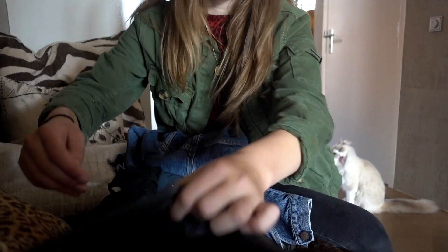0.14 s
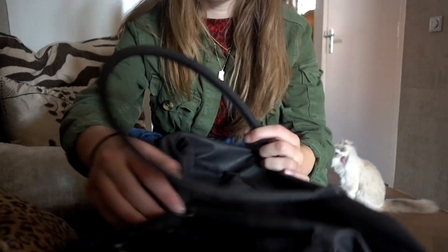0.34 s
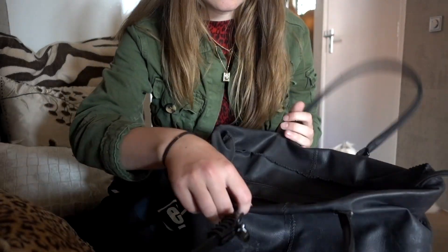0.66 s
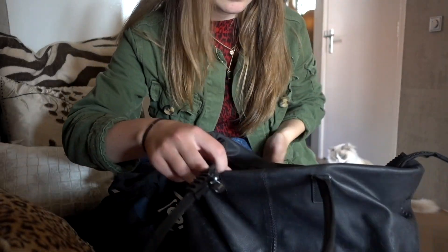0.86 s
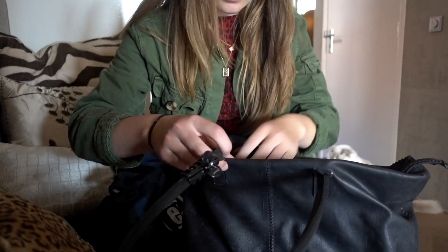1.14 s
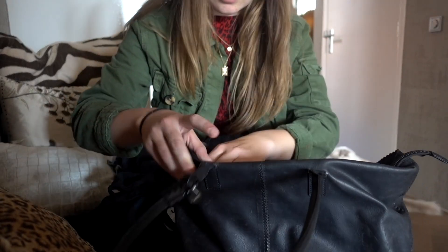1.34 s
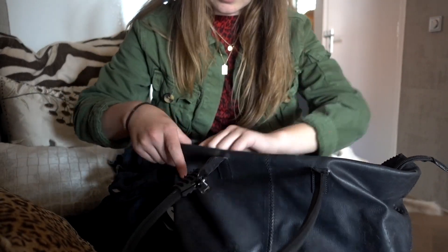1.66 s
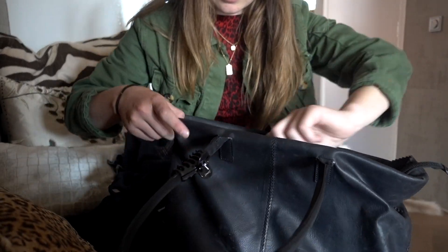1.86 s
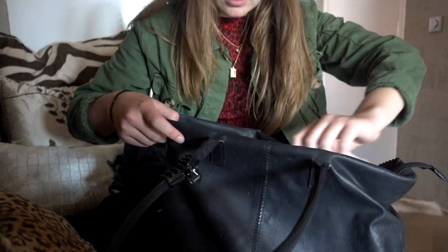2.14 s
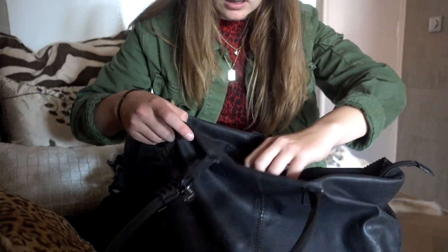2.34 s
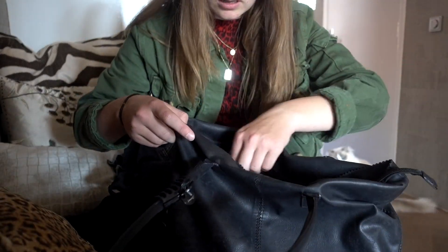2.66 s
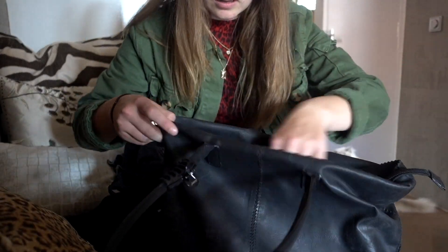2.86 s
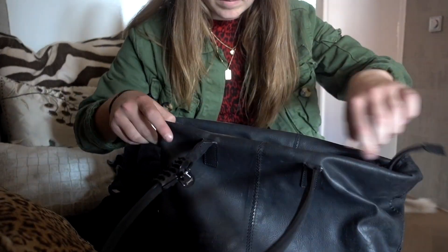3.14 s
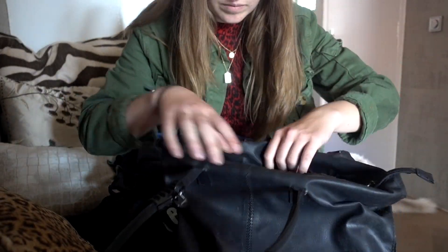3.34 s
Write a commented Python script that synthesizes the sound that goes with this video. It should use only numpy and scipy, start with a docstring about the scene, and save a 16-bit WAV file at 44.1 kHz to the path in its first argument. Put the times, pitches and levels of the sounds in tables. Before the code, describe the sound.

A soft leather handbag is handled close to a stereo microphone in a furnished room. Rustling is fullest in the first 0.9 seconds, with a scuffle at 0.24 and dull knocks, then quieter with a crackle at 1.25. A brief stuttering drag at 1.8-2.0 ends in a sharp snap. Scuffs at 2.7 precede the loudest, squeakier scrape at 2.93-3.15, then a knock at 3.3. Faint hiss, short room tail.

```python
"""A furnished room, a stereo microphone close by: a soft leather handbag is pulled onto a lap and searched.
The leather rustles all along, as banded noise and tiny clicks; twice a hand drags over its grain and chatters,
stick and slip. Things inside knock dully, leather catches and lets go, brief bright rustles stand out and the
bag's weight thumps softly, all as bursts of ringing noise. A short room tail and a faint hiss lie under it."""
import sys
import numpy as np
from scipy import signal
from scipy.fft import rfft, irfft
from scipy.io import wavfile
from scipy.ndimage import uniform_filter1d

SR = 44100
rng = np.random.default_rng(int(sys.argv[2]) if len(sys.argv) > 2 else 0)


def bounce(signal):
    """Save signal as a 16-bit WAV file at the path given by the first command-line argument."""
    frames = np.transpose(np.atleast_2d(signal))
    limited = np.clip(frames, -1, 1)
    pcm = np.round(limited * 32767).astype(np.int16)
    wavfile.write(sys.argv[1], SR, pcm)


def attenuation_scalar(level_db):
    """Turn a level in dB into a linear amplitude multiplier (20 dB per decade)."""
    decades = np.asarray(level_db, float) / 20
    return 10 ** decades


N = 154350  # 3.5 s


# hand movement on the leather: (time [s], level [dB], treble lift before levelling [dB])
RUSTLE = [(0, -54, 0.5), (.08, -52.5, 3), (.13, -45, -1), (.22, -47.5, -3), (.28, -46, -2.5),
          (.45, -43, 0.5), (.58, -49, 1), (.72, -45, -1), (.95, -52, -2.5), (1.17, -55, -5.5),
          (1.34, -50.5, -1.5), (1.6, -51, -2), (1.76, -49.5, 1.5), (2.03, -49.5, -0.5), (2.3, -54.5, 2),
          (2.47, -50, -5), (2.66, -53, 1), (2.82, -44, -8), (2.88, -65.5, 9), (3.25, -47, 1),
          (3.5, -49, 0.5)]
# tone of the rubbed leather, relative: (frequency [Hz], density [dB per Hz])
LEATHER_TONE = [(40, -20), (130, -24), (230, -10), (450, -1.5), (660, -1.5), (1100, -5.5), (1600, -1),
                (2080, 2), (4340, -12.5), (9940, -12.5), (16000, -19.5)]
CREASES_PER_S, CREASE_SHARE = 300, 0.64  # share: rms beside sliding noise of 1
CRACKS_PER_S, CRACK_SHARE = 90, 0.45
FLUTTER_DB, PATCHY_DB = 2, 1.5  # spread of the bands' level, together and each alone
TREBLE_HZ = 3700


def rustle(t):
    """Each half octave has its own sliding noise and creases, shares wide cracks, and flutters in part alone."""
    freq = np.arange(N // 2 + 1) * SR / N
    together = walk(24.98)
    cracks = creases(CRACKS_PER_S)
    out = 0
    for hz in 60 * 2 ** np.arange(0, 8.6, .5):
        # neighbouring bands overlap
        share = np.cos(np.pi / 2 * np.clip(2 * np.log2((freq + 1) / hz), -1, 1))
        contact = rng.standard_normal(N) + CREASE_SHARE * creases(CREASES_PER_S) + CRACK_SHARE * cracks
        banded = irfft(rfft(contact) * share, N)
        lift_db = curve(RUSTLE, 2, t) * (hz > TREBLE_HZ)
        out = out + banded * attenuation_scalar(FLUTTER_DB * together + PATCHY_DB * walk(18) + lift_db)
    return unit(colour(out, LEATHER_TONE)) * attenuation_scalar(curve(RUSTLE, 1, t))


CREASE_SPREAD_DB = 0.5


def creases(per_s):
    """Clicks at random moments, of uneven size and either sign, rms 1."""
    draw = rng.random((3, N))
    happens = draw[0] < per_s / SR
    size = attenuation_scalar(-CREASE_SPREAD_DB * np.log(1 - .98 * draw[1]))
    return unit(happens * size * np.sign(draw[2] - .5))


# two drags of a hand over the grain, each: (time [s], level [dB], slip rate [per s], smear [0-1])
DRAGS = [
    [(1.775, -52, 450, 0.61), (1.8, -38.5, 470, 0.65), (1.84, -33, 450, 0.68), (1.865, -34.5, 355, 0.49),
     (1.885, -33.5, 313, 0.34), (1.91, -36.5, 435, 0.59), (1.935, -31.5, 440, 0.47), (1.96, -38, 440, 0.4),
     (1.975, -45.5, 400, 0.5), (1.99, -59, 470, 0.8)],
    [(2.912, -49.5, 870, 0.45), (2.935, -31, 740, 0.57), (2.955, -27, 680, 0.47), (2.98, -26.5, 760, 0.57),
     (3.0, -26, 880, 0.42), (3.02, -26.5, 950, 0.55), (3.035, -23, 1014, 0.42), (3.05, -22, 1100, 0.38),
     (3.066, -25, 770, 0.48), (3.09, -24, 633, 0.48), (3.108, -24, 520, 0.88), (3.122, -29, 410, 0.95),
     (3.2, -57, 310, 0.83)],
]
# tone of the dragged leather, relative: (frequency [Hz], density [dB per Hz])
DRAG_TONE = [(60, -53), (250, -20.5), (345, -11.5), (600, -13.5), (950, -6), (1200, -9.5), (1450, -4),
             (2050, -6), (3020, -4), (4420, -16), (12700, -16), (16000, -22)]
SLIP_JITTER, SLIP_SPREAD_DB = 0.11, 1.5  # jitter: share of the slip rate at full smear
PANEL_DB = 0.5
SHIFTS_PER_S, NEAR_T60_S = 220, 0.053  # also used by the near reflections


def drag(t, rows):
    """Stick and slip: a click per slip, wavering in rate and size, smeared by sliding noise."""
    smear = np.clip(curve(rows, 3, t), 0, 1)
    slip_rate = curve(rows, 2, t) * (1 + SLIP_JITTER * smear * walk(600))
    phase = np.cumsum(slip_rate / SR) % 1
    slips = unit(np.exp(-phase / 0.052) - .04) * attenuation_scalar(SLIP_SPREAD_DB * walk(300))
    # the slack panels ring along unevenly
    slips = slips + attenuation_scalar(PANEL_DB) * tail(slips * walk(SHIFTS_PER_S), NEAR_T60_S)
    slide = rng.standard_normal(N) * attenuation_scalar(2 * walk(150))
    grain = unit(colour((1 - smear) * slips + smear * slide, DRAG_TONE))
    touching = (t > rows[0][0]) * (t < rows[-1][0])
    return grain * attenuation_scalar(curve(rows, 1, t)) * touching


# things bumping inside the bag: (time [s], peak level [dB], hollow pitch [Hz], snap over hollow [dB])
KNOCKS = [(0.092, -48.5, 625, 9), (0.352, -39.5, 870, -2), (0.487, -45, 746, 14), (0.606, -38, 600, -18),
          (0.848, -36.5, 707, -21), (1.524, -41.5, 586, 6.5), (1.792, -30.5, 650, -8), (2.05, -36, 620, 0),
          (2.079, -34.5, 580, -6.5), (2.108, -37.5, 442, -11), (2.496, -36, 474, -7),
          (2.593, -36.5, 500, -7), (2.629, -44, 474, 2), (3.274, -52.5, 696, 16.5), (3.323, -29, 828, -3.5),
          (3.422, -37.5, 400, -25)]
KNOCK_WIDTH_HZ, KNOCK_S = 325, 0.015
SNAP_HZ, SNAP_WIDTH_HZ, SNAP_S = 1745, 1320, 0.023


def knocks():
    """Each bump rings the hollow bag and snaps the leather."""
    out = np.zeros(N)
    for s, db, hz, snap_db in KNOCKS:
        hollow = burst(KNOCK_S, db, hz, KNOCK_WIDTH_HZ)
        snap = burst(SNAP_S, db + snap_db, SNAP_HZ, SNAP_WIDTH_HZ)
        add(out, s, hollow + snap)
    return out


# leather catching and letting go, from one snap to a short scuffle: (time [s], peak level [dB], length [s])
SCUFFS = [(0.24, -34, 0.078), (1.252, -30.5, 0.044), (1.518, -31.5, 0.0047), (2.004, -26.5, 0.0019),
          (2.71, -31.5, 0.0088), (2.761, -29.5, 0.053)]
BAG_HZ, BAG_DB = 650, -3.5  # level under the crackle


def scuffs():
    """Each catch crackles brightly and rings the hollow bag, both bursts sharing one length."""
    out = np.zeros(N)
    for s, db, length_s in SCUFFS:
        crackle = burst(length_s, db, SNAP_HZ, SNAP_WIDTH_HZ)
        hollow = burst(length_s, db + BAG_DB, BAG_HZ, KNOCK_WIDTH_HZ)
        add(out, s, crackle + hollow)
    return out


# short bright bursts of leather rustle: (time [s], peak level [dB], centre [Hz], length [s])
BRIGHT_RUSTLES = [(0.432, -35.5, 6700, 0.021), (0.443, -34.5, 10100, 0.021), (0.53, -37.5, 9450, 0.042),
                  (1.261, -38, 8300, 0.058), (1.4202, -41, 8700, 0.026), (2.044, -29.5, 15400, 0.041),
                  (2.11, -41, 15000, 0.026), (2.261, -44.5, 8600, 0.049), (2.772, -41.5, 7060, 0.03),
                  (3.26, -36, 7050, 0.043), (3.291, -39, 13500, 0.052), ]
BRIGHT_WIDTH = 0.75  # share of the centre


def bright_rustles():
    """Brief bright rustles, each a burst through one broad high resonance."""
    out = np.zeros(N)
    for s, db, hz, length_s in BRIGHT_RUSTLES:
        add(out, s, burst(length_s, db, hz, BRIGHT_WIDTH * hz))
    return out


# the bag's weight shifting softly on the lap: (time [s], peak level [dB])
THUDS = [(0.096, -56), (0.202, -48), (0.347, -47), (0.436, -57), (.534, -47), (0.657, -46), (0.883, -59),
         (0.968, -53), (1.276, -49), (1.923, -48), (2.1, -52), (2.59, -54), (3.024, -43), (3.322, -46.5)]
THUD_HZ, THUD_S = 219, 0.0071


def thuds():
    """Short low thumps, each a burst through a resonance as wide as its pitch."""
    out = np.zeros(N)
    for s, db in THUDS:
        add(out, s, burst(THUD_S, db, THUD_HZ, THUD_HZ))
    return out


# left-right difference at the stereo microphone: (frequency [Hz], side minus mid [dB])
SPACING = [(200, -31.5), (700, -6.5), (2400, -9.5), (4400, 1), (15000, -0.5)]


def near_reflections(mid):
    """Near reflections, shifting with hands and bag, part left from right in the treble."""
    return colour(tail(mid * walk(SHIFTS_PER_S), NEAR_T60_S), SPACING)


ROOM_T60_S, ROOM_DB, ROOM_DULL_HZ = 0.59, -8, 5500


def room(bag):
    """The furnished room answers with a short tail, duller than the bag."""
    dull = signal.lfilter(*signal.butter(1, ROOM_DULL_HZ, fs=SR), bag)
    return attenuation_scalar(ROOM_DB) * tail(dull, ROOM_T60_S)


def hiss():
    """Faint steady white noise."""
    return attenuation_scalar(-65.5) * rng.standard_normal(N)


def tail(x, t60_s):
    """x through a dense cloud of echoes, energy 1, cut after half a second."""
    t = np.arange(SR // 2) / SR
    echoes = rng.standard_normal(SR // 2) * np.exp(-np.log(1000) * t / t60_s)
    return signal.fftconvolve(x, echoes / np.sqrt(np.sum(echoes ** 2)))[:N]


RISE_SHARE = 0.054  # rise time as a share of a burst's length


def burst(length_s, peak_db, hz, width_hz):
    """Several contacts: ragged noise rises fast, dies 60 dB in four lengths and rings one steep resonance."""
    t = np.arange(8192) / SR
    ragged = attenuation_scalar(3 * np.repeat(rng.standard_normal(64), 128))
    rise = 1 - np.exp(-t / (RISE_SHARE * length_s))
    decay = np.exp(-np.log(1000) * t / (4 * max(length_s, .001)))
    contacts = rng.standard_normal(len(t)) * ragged * rise * decay
    ring = band(band(contacts, hz, width_hz), hz, width_hz)
    return ring * attenuation_scalar(peak_db) / np.abs(ring).max()


def band(x, hz, width_hz):
    """One resonance."""
    return signal.lfilter(*signal.iirpeak(min(hz, .45 * SR), hz / width_hz, SR), x)


def colour(x, table):
    """Filter by (frequency [Hz], level [dB]) points with a causal, minimum-phase response."""
    freq = np.maximum(np.arange(1025) * SR / 2048, 10)
    hz, db = np.array(table, float).T
    cepstrum = irfft(np.interp(np.log(freq), np.log(hz), db) * np.log(10) / 20)
    # fold the backward half forward
    cepstrum[1:1024] *= 2
    cepstrum[1025:] = 0
    response = irfft(np.exp(rfft(cepstrum)))
    return signal.fftconvolve(x, response)[:len(x)]


def walk(rate):
    """Slow chance, spread 1: random levels, rate per second, joined by ramps."""
    k = int(SR / rate)
    held = np.repeat(rng.standard_normal(N // k + 1), k)
    return unit(uniform_filter1d(held, k)[:N])


def curve(table, col, t):
    """A table column joined by straight lines."""
    return np.interp(t, [r[0] for r in table], [r[col] for r in table])


def unit(x):
    """Scale to rms 1."""
    return x / np.sqrt(np.mean(x ** 2))


def add(out, s, x):
    """Mix x into out from time s."""
    i = int(s * SR)
    out[i:i + len(x)] += x[:len(out) - i]


LEFT_DB = 0.8  # left over right


def scene():
    """The bag close by, its room tail and the hiss, spread over left and right."""
    t = np.arange(N) / SR
    drags = sum(drag(t, rows) for rows in DRAGS)
    bag = rustle(t) + drags + knocks() + scuffs() + bright_rustles() + thuds()
    mid = bag + room(bag) + hiss()
    side = near_reflections(mid)
    return np.array([(mid + side) * attenuation_scalar(LEFT_DB / 2), (mid - side) * attenuation_scalar(-LEFT_DB / 2)])


def band_limit(x):
    """A steep low-pass at the top of the band."""
    return signal.sosfilt(signal.butter(12, 16820, fs=SR, output="sos"), x)


def record(dry):
    """The microphone thins the deep bass and the recorder cuts the top."""
    thinned = signal.sosfilt(signal.butter(2, 89, "high", fs=SR, output="sos"), dry)
    mix = signal.sosfilt(signal.ellip(10, .2, 70, 15900, fs=SR, output="sos"), thinned)
    return band_limit(mix)


dry = scene()
out = record(dry)
bounce(out)
```